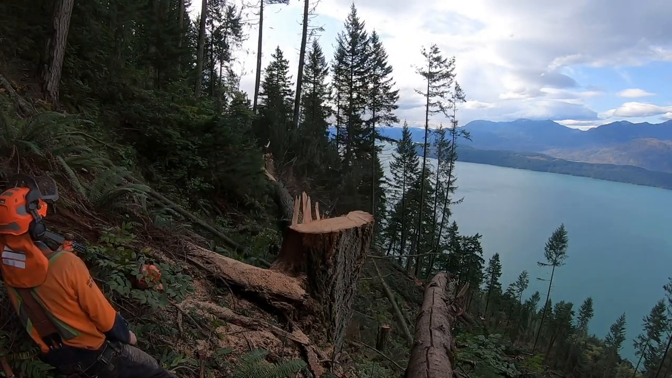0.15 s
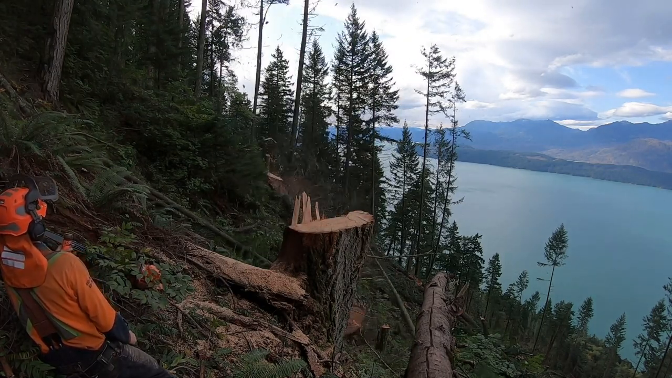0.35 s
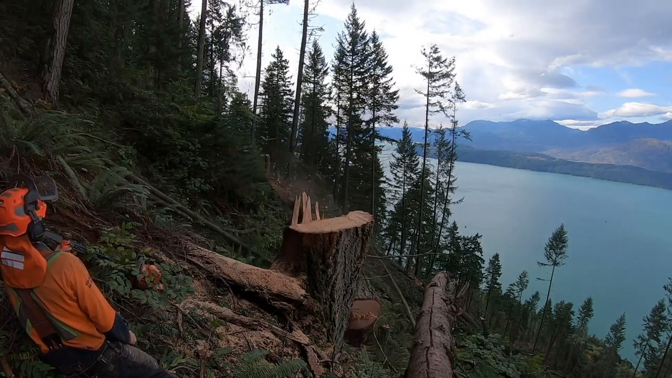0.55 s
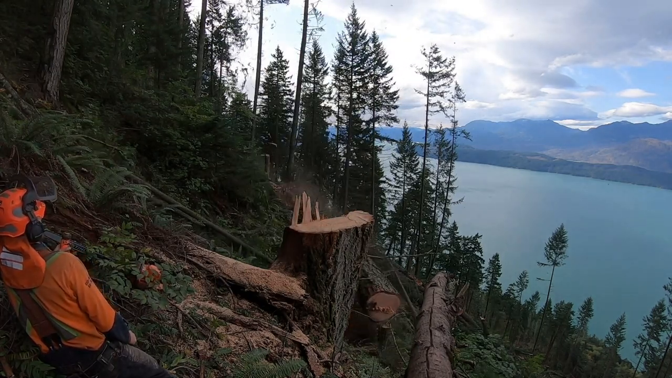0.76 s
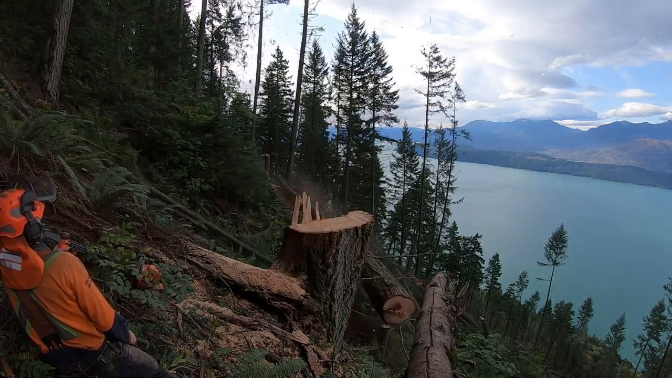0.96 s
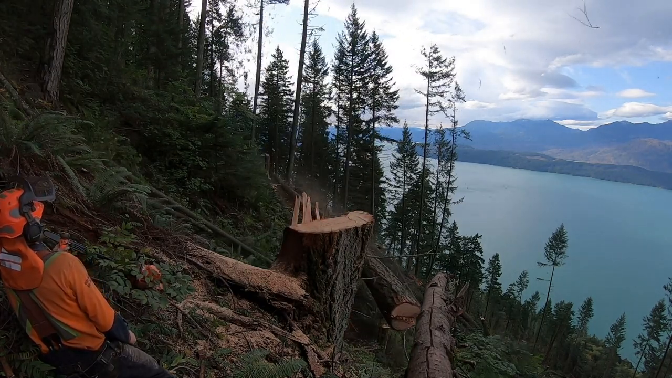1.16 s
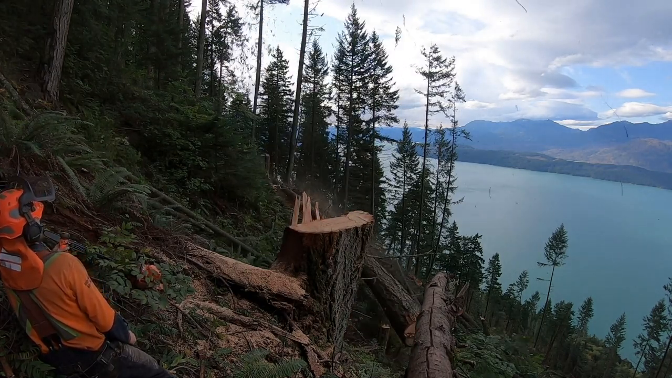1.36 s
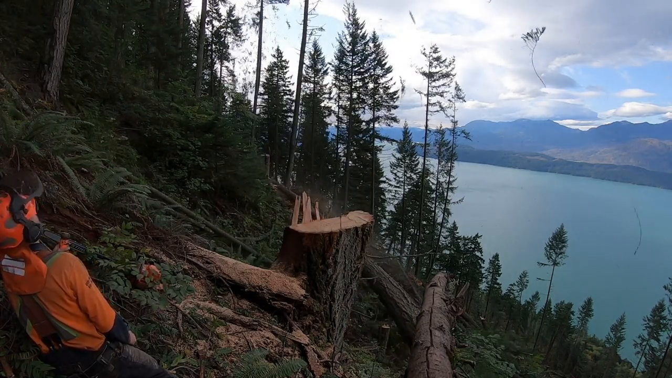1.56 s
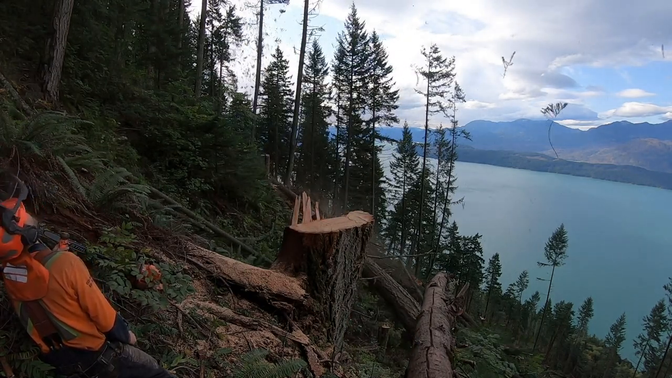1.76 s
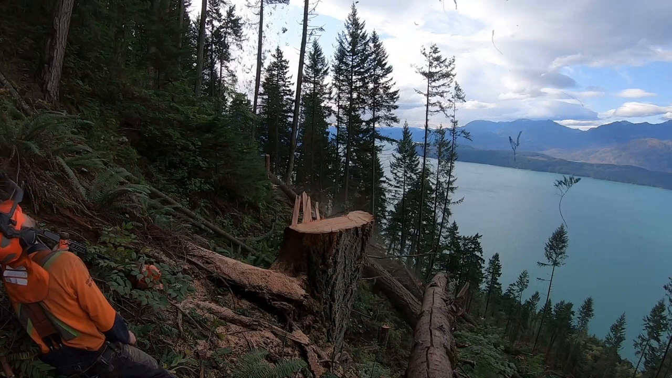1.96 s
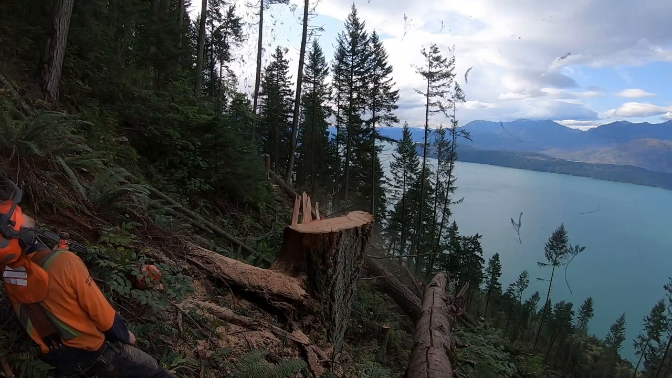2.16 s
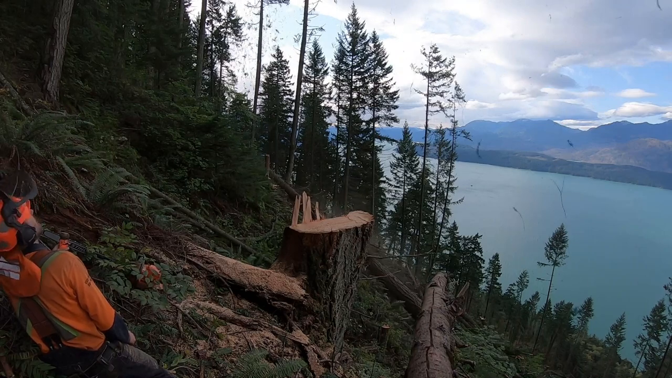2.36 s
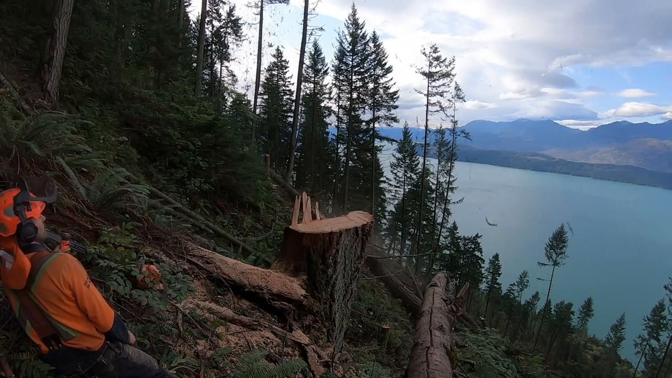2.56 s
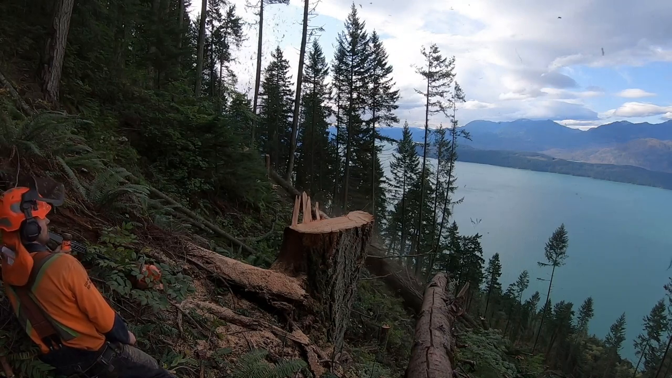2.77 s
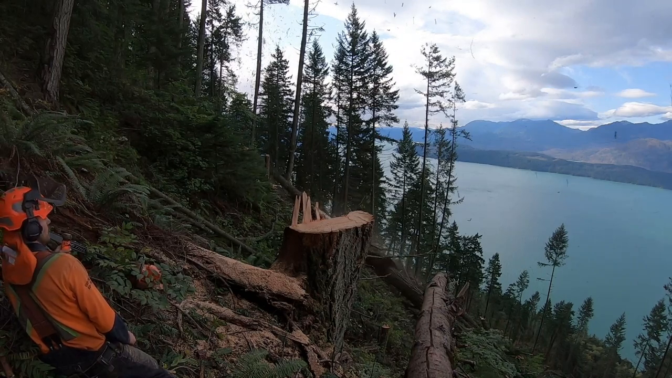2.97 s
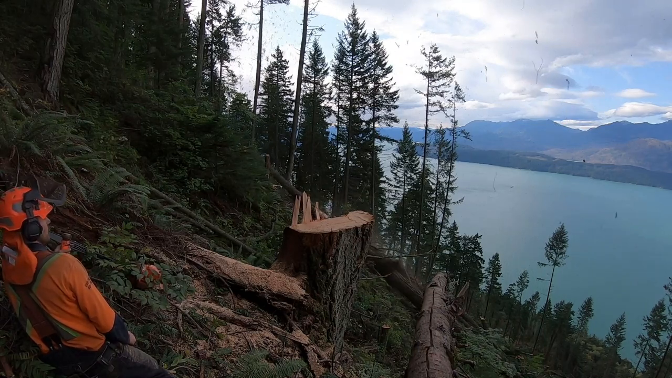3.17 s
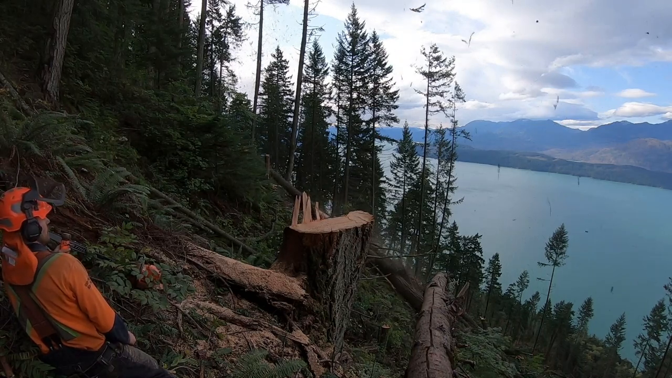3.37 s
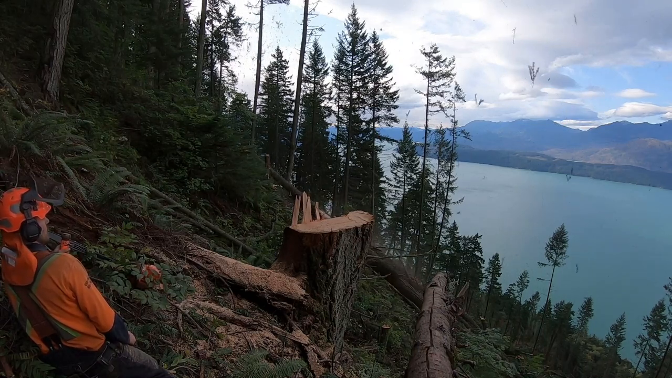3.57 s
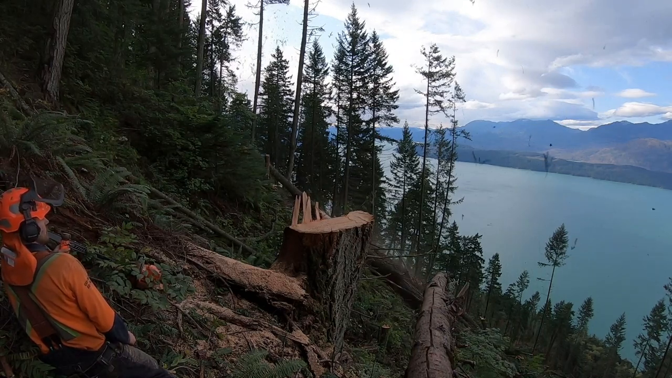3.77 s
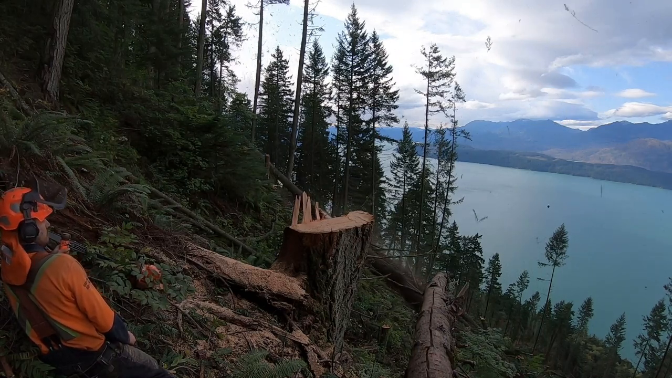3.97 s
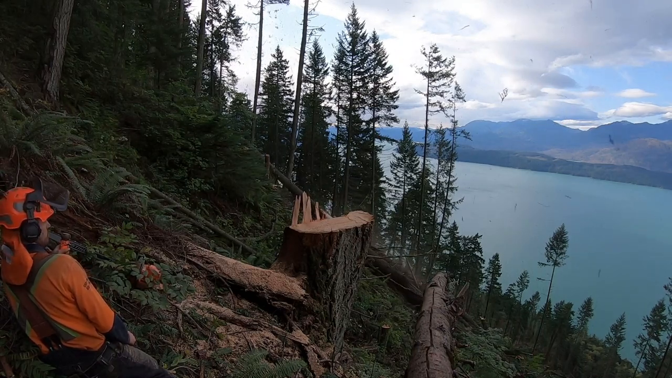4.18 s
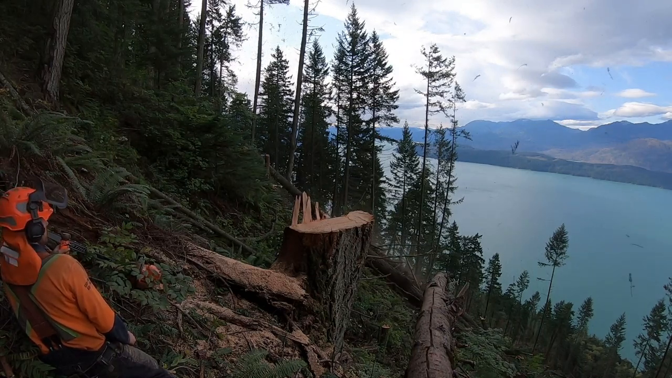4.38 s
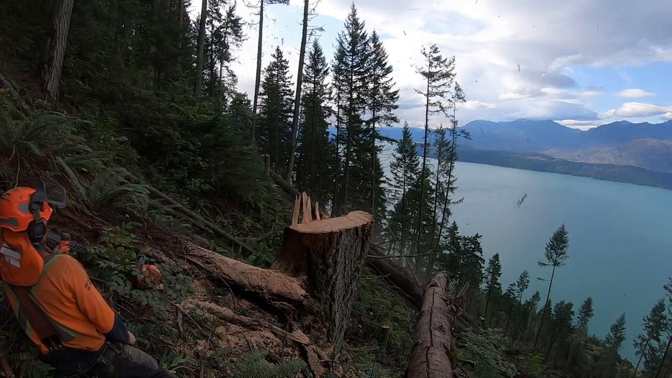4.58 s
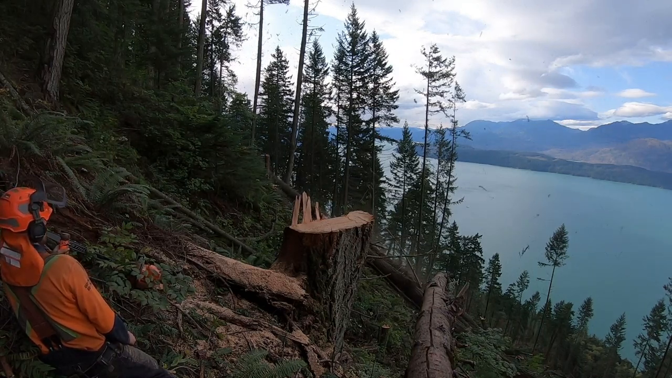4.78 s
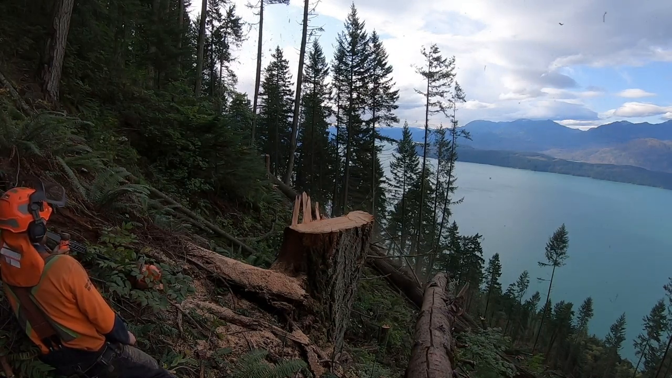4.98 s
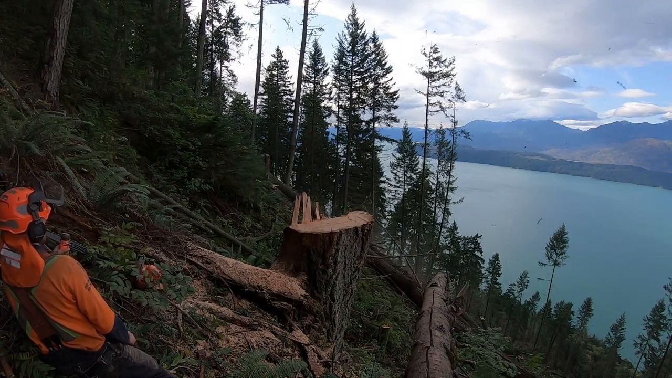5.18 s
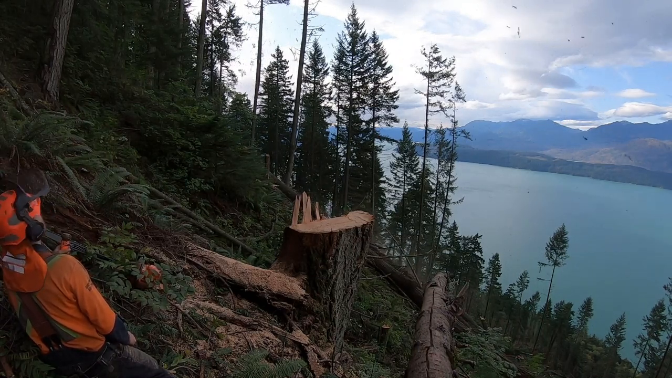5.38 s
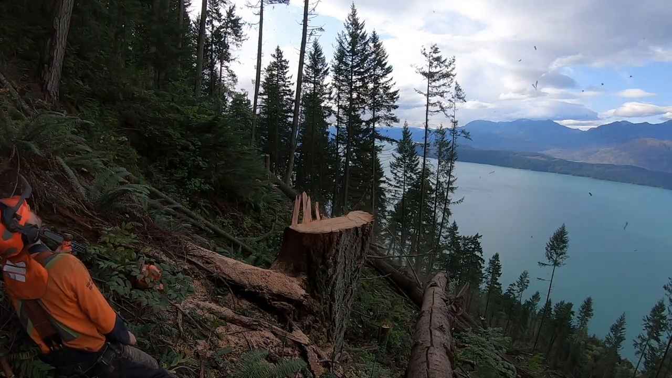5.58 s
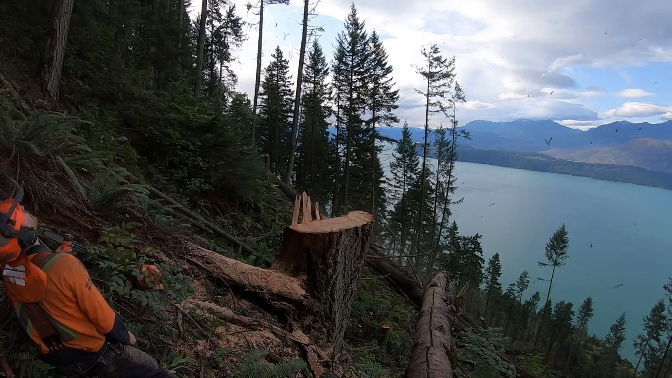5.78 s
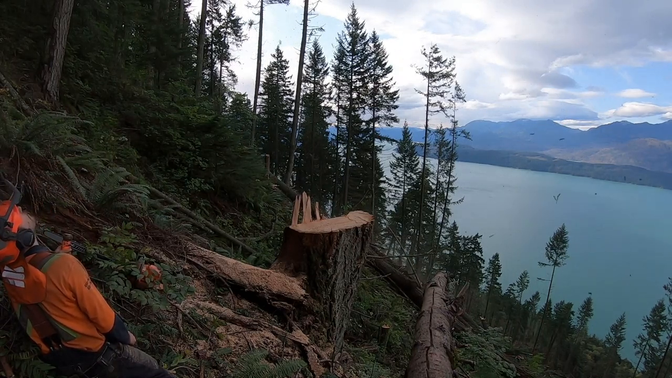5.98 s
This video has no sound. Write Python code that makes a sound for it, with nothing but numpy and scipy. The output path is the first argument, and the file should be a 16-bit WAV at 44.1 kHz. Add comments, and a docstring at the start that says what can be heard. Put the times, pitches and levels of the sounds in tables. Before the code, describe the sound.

Low, heavy pounding and dense crackling come first, over rumbling soil and hissing needles. The noise drops to light snaps, then surges midway with loud hollow limb knocks and more ground thuds. Dry branches keep popping, many crisp and close together, until only faint rustle and small clicks remain. Heard close to the stump through a small stereo microphone, surrounding trunks scattering each crack.

```python
"""A steep forest slope, heard from beside a stump: a big felled conifer crashes and slides downhill.
The trunk pounds the ground in deep decaying swings, and filtered noise keeps the soil rumbling.
Limbs knock and wrench, branches snap: each is a sagging tone with a burst of torn-fibre noise.
The rushing crown is made of thousands of tiny clicks, shaped into grinding, crackle and hiss.
The standing trees scatter every knock and snap back as a quick flurry and a long dull tail."""
import sys
import numpy as np
from scipy import signal
from scipy.fft import rfft, irfft, next_fast_len
from scipy.io import wavfile
from scipy.ndimage import uniform_filter1d

SR = 44100
rng = np.random.default_rng(int(sys.argv[2]) if len(sys.argv) > 2 else 0)


def transcribe(u):
    """Save the signal u as a 16-bit wav file named by the first command-line argument.

    u: samples, shape (n,) or (channels, n), limited to [-1, 1]; the rate is SR.
    q: integer samples, one column per channel.
    """
    v = np.clip(np.atleast_2d(u).T, -1, 1)
    q = np.round(v * 32767).astype(np.int16)
    wavfile.write(sys.argv[1], SR, q)


N = 266143
T = np.arange(N) / SR

# the steady slide between crashes: time_s, ground_rumble_db, crown_rustle_db
SLIDE = [(0, -26, -23), (0.3, -28, -27.5), (0.65, -20.5, -28.5), (1.03, -24, -30), (1.26, -28.5, -38),
         (1.5, -39, -40), (2.0, -36, -40), (2.36, -27, -40.5), (2.6, -31, -38.5), (3.08, -24, -37.5),
         (3.33, -28.5, -39.5), (3.97, -34.5, -40.5), (4.6, -37.5, -37.5), (5.2, -35.5, -42.5),
         (5.4, -52, -46), (5.77, -53.5, -49), (6.03, -45, -40)]
# pitch of the ground's shaking, higher once the trunk has slid away downhill: time_s, pitch_hz
GROUND_PITCH = [(0, 53.3), (1.3, 51.2), (2.4, 70.3), (6.03, 65.5)]
# the crown ploughs into trees and ground:
# full_level_s, hold_s, ground_rumble_db, limb_grinding_db, twig_crackle_db
CRASHES = [(0.079, 0.17, -18, -34, -24.5), (0.402, 0.16, -18, -33, -29.5), (1.75, 0.093, -39, -37, -43.5),
           (2.062, 0.28, -46, -43, -44.5), (2.635, 0.1, -23, -26.5, -30), (2.726, 0.13, -18.5, -27.5, -37),
           (2.923, 0.084, -23, -33, -36.5), (3.43, 0.1, -31, -34.5, -32.5), (3.584, 0.026, -23, -21, -32.5),
           (3.693, 0.16, -42, -37.5, -39), (4.081, 0.037, -39, -31, -30.5), (4.357, 0.023, -32, -27, -38.5),
           (4.469, 0.034, -25.5, -33, -38), (4.79, 0.071, -26.5, -35.5, -59), (5, 0.04, -58, -38, -60),
           (5.546, 0.034, -46, -49, -47), (5.84, 0.15, -55, -49, -42.5)]
# the trunk pounds the ground: start_s, level_db, pitch_hz
POUNDS = [(0.066, -4, 47), (0.183, -9.5, 46.2), (0.409, -8.5, 44.7), (0.459, -7.5, 47), (0.672, -8.5, 52),
          (1.042, -15.5, 63.4), (2.79, -25, 56.6), (2.92, -12, 65), (3.071, -15, 58), (3.421, -12, 75.4),
          (3.58, -10, 65.5), (3.69, -15, 64.5), (5.602, -34.5, 57.4)]
# heavy limbs knock and burst: time_s, level_db, pitch_hz
KNOCKS = [(0.003, -17.5, 294), (1.054, -19, 131), (2.082, -19, 423), (2.093, -19.5, 259),
          (2.252, -21.5, 274), (2.36, -23, 141), (2.619, -8.5, 607), (2.85, -10.5, 336), (2.957, -12, 286),
          (3.42, -11, 397), (3.524, -19.5, 273), (3.554, -15.5, 250), (3.566, -19, 290), (3.6001, -4, 262),
          (3.6022, -9, 470), (4.355, -18.5, 214), (4.471, -15.5, 230), (4.749, -14, 196),
          (4.7903, -17, 244), (4.819, -18, 176), (5.53, -31, 273), (5.582, -25, 335), (5.652, -28, 368),
          (5.999, -18.5, 570)]
# green limbs wrench and tear slowly: time_s, level_db, pitch_hz
WRENCHES = [(0.12, -11.5, 470), (0.146, -13, 388), (0.216, -13, 570), (1.784, -28, 806), (3.2, -21, 513),
            (3.228, -19, 656), (3.268, -20, 545)]
# the loudest branches snap: time_s, level_db, pitch_hz, left_minus_right_db
SNAPS = [(0.032, -11.5, 4080, 0), (0.0598, -11.5, 1256, 5), (0.342, -9, 1690, 0), (0.467, -9.5, 1530, 4),
         (0.876, -16.5, 3190, -2), (1.006, -14, 1390, -10), (1.034, -15, 1600, 3), (1.0589, -11, 4280, 0),
         (1.0596, -20.5, 8850, -10), (1.161, -24.5, 4600, -3), (1.443, -24, 3500, -11),
         (1.513, -22.5, 2280, -8), (1.5926, -15.5, 3000, -3), (1.6715, -22, 3420, -3),
         (1.9092, -18.5, 2560, -9), (2.0271, -20, 2135, 4), (2.5282, -15, 3080, -4),
         (2.762, -18, 1290, -18), (2.8095, -20, 1610, -24), (2.8535, -10.5, 1100, -1),
         (2.8779, -7, 2324, 2), (2.992, -15, 2221, 5), (3.0126, -11, 1900, 2), (3.079, -24, 2580, -10),
         (3.325, -18, 3240, -10), (3.4232, -16.5, 1126, -1), (3.487, -16.5, 2660, -11),
         (3.5272, -18.5, 1340, -15), (3.552, -15, 3350, -3), (3.579, -12, 1850, 2), (3.593, -11, 1340, 4),
         (3.747, -21, 3500, 3), (3.859, -21, 2580, 2), (4.0565, -23, 2880, -12), (4.096, -27, 3100, -11),
         (4.114, -17, 3000, -7), (4.133, -14, 1800, -10), (4.2072, -22.5, 3300, -6), (4.298, -14, 1690, -7),
         (4.307, -14, 3110, -4), (4.322, -21, 2520, -5), (4.3711, -9.5, 1460, 4), (4.4125, -15.5, 1990, 4),
         (4.4387, -11.5, 2717, -8), (4.4845, -10.5, 2400, 2), (4.4883, -8.5, 1130, 2), (4.54, -14, 1410, 4),
         (4.5632, -23.5, 4220, 0), (4.626, -14.5, 3660, -6), (4.6349, -14.5, 1386, -5),
         (4.707, -18, 3270, -6), (4.7442, -12, 1700, 0), (4.7458, -6, 1170, 0), (4.8327, -12.5, 1156, -3),
         (4.841, -24.5, 3600, -6), (5.023, -19.5, 1330, 0), (5.128, -14.5, 2200, 4), (5.166, -17, 2070, 6),
         (5.285, -21, 4160, -7), (5.4885, -19.5, 3010, -4), (5.567, -30, 3660, -4), (5.921, -32, 3160, -4)]
# colour of the crushed crown, before its layers are levelled: frequency_hz, relative_db
CROWN_COLOUR = [(70, 3), (130, 3.5), (300, -1.5), (600, -5), (1200, -3), (2200, -6), (3400, -9),
                (5000, -20.5), (7000, -22), (10000, -27.5), (15000, -25.5)]
# how unlike the two ports hear the slope: frequency_hz, side_minus_mid_db
STEREO_WIDTH = [(60, -21), (170, -47), (350, -20), (700, -7.5), (1400, -4), (2800, -10.5), (5500, -5.5),
                (9000, 1)]
# colour of the microphone ports: frequency_hz, gain_db
PORT_COLOUR = [(15, -44), (35, 1), (3800, -3), (4800, -1.5), (7100, -0.5), (8100, -7), (9600, -1.5),
               (10700, -7), (11600, -16), (14000, -18), (15500, -30.5)]
# balance of the microphone ports: frequency_hz, left_minus_right_db
PORT_BALANCE = [(200, -.6), (3900, -.6), (6900, 2), (9900, -6), (10900, -11), (12000, -6)]

TOP_HZ = 15500
# a crash builds quickly, holds, then dies away; the soil settles more slowly than the crown
CRASH_ATTACK_DB_PER_S, CROWN_RELEASE_DB_PER_S, GROUND_RELEASE_DB_PER_S = 400, 140, 119
# limbs grind a little under the rustle; needles hiss under the twigs and swell less than they do
LIMB_UNDER_DB, NEEDLE_UNDER_DB, NEEDLE_SWELL, USUAL_TWIG_DB = -2.5, -10, 0.91, -38.5
# decay of each swing, in cycles of its own pitch
POUND_CYCLES, KNOCK_CYCLES, WRENCH_CYCLES = 1.37, 1.7, 7
# thin branches ring for more cycles: cycles at the reference pitch, and the power of pitch they grow with
SNAP_CYCLES, SNAP_REFERENCE_HZ, SNAP_RING_POWER = 2.9, 1512, 0.32
# small sticks: range of pitch, level above the twig crackle, its scatter, and spread left to right
STICK_LOW_HZ, STICK_HIGH_HZ = 970, 6120
STICK_OVER_DB, STICK_SCATTER_DB, STICK_PAN_DB = 7, 0.5, 8
# bright tick of the last fibres: level before it softens for thick branches, time to peak, lower edge
TICK_DB, TICK_DECAY_S, TICK_LOW_HZ = -20.5, 0.0016, 3550


def undb(db):
    """Decibels to gain."""
    return 10 ** (np.asarray(db) / 20)


def unit(x):
    """Scale to rms 1."""
    return x / np.sqrt(np.mean(x ** 2))


def along(points, hz):
    """Read (Hz, value) points on a log-frequency axis."""
    f, value = np.transpose(points)
    return np.interp(np.log(hz + 1), np.log(f), value)


def shape(x, gain):
    """Filter by a gain that is a function of frequency."""
    size = next_fast_len(N + 8192)
    spectrum = rfft(x, size) * gain(np.fft.rfftfreq(size, 1 / SR))
    return irfft(spectrum, size)[..., :N]


def band(x, lo_hz, hi_hz, order=2):
    """Causal band-pass."""
    edges = [lo_hz, min(hi_hz, .47 * SR)]
    return signal.sosfilt(signal.butter(order, edges, "band", fs=SR, output="sos"), x)


def add(out, s, sound):
    """Mix a sound in at time s."""
    i = max(int(s * SR), 0)
    out[..., i:i + sound.shape[-1]] += sound[..., :N - i]


def spread(mid, side):
    """Turn mid and side into left and right, with a stereo width that varies with frequency."""
    side = shape(side, lambda f: undb(along(STEREO_WIDTH, f)))
    return mid + side * np.array([[1], [-1]])


def walk(per_s):
    """Glide in straight lines between random levels; the spread is near 1.9."""
    hold = int(SR / per_s)
    steps = np.repeat(rng.standard_normal(N // hold + 1), hold)
    return 2.3 * uniform_filter1d(steps, hold)[:N]


def with_crashes(slide_db, crash_dbs, release_db_per_s):
    """Level of one layer: the steady slide plus the attack, hold and release of every crash."""
    power = undb(slide_db) ** 2
    for (s, hold, *_), db in zip(CRASHES, crash_dbs):
        before_db = CRASH_ATTACK_DB_PER_S * np.maximum(s - T, 0)
        after_db = release_db_per_s * np.maximum(T - s - hold, 0)
        power = power + undb(db - np.minimum(before_db + after_db, 100)) ** 2
    return 10 * np.log10(power)


def recoil(hz, cycles, rise, sag):
    """A swing that builds, then dies away while its pitch sags; returns the swing and its envelope."""
    # rise and decay are counted in cycles
    turn = np.arange(int(SR * (rise + 7 * cycles) / hz)) * hz / SR
    attack = np.sin(np.pi / 2 * np.minimum(turn / rise, 1)) ** 2
    envelope = attack * np.exp(-np.maximum(turn - rise, 0) / cycles)
    pitch = hz * (1 + sag * (np.exp(-turn / (rise + cycles)) - .5))
    return envelope * np.sin(2 * np.pi * np.cumsum(pitch) / SR), envelope


def fracture(hz, cycles, rise, sag, ring_db, tear_db, splinter_db):
    """One break: the recoil, fibres tearing around its pitch, and a thin spray of splinters above."""
    swing, envelope = recoil(hz, cycles, rise, sag)
    size = len(swing)
    # the first 1000 samples let the filters settle and are dropped
    fibres = rng.standard_normal((2, size + 1000))
    # the envelope says how many fibres give way at each moment
    tear = unit(band(fibres[0], 0.45 * hz, 1.503 * hz, order=3)[-size:] * envelope)
    splinters = unit(band(fibres[1], hz, 2.24 * hz)[-size:] * envelope)
    noise = undb(tear_db) * tear + undb(splinter_db) * splinters
    return undb(ring_db) * swing + np.std(swing) * noise


def forest(x, near_db, near_t60, far_db, far_t60, far_top_hz):
    """Nearby trunks scatter a quick flurry of echoes; the far slope returns a long dull tail."""
    t = T[:SR]
    # cubing the noise leaves a few strong echoes among many faint ones
    flurry = rng.standard_normal((2, SR)) ** 3 * undb(-60 * t / near_t60) * (t > .003)
    tail = band(rng.standard_normal((2, SR)), 270, far_top_hz, order=1)
    tail = tail * undb(-60 * t / far_t60) * np.minimum(t / 0.044, 1)
    response = (undb(near_db) * unit(flurry) + undb(far_db) * unit(tail)) / np.sqrt(SR)
    mid, side = signal.fftconvolve(x[None], response, axes=1)[:, :N]
    return spread(mid, side)


def ground(rumble_db, width_octaves=0.44, skirt_db=-15):
    """The sliding trunk keeps the soil shaking: bands of noise weighted around one deep pitch."""
    centre = np.interp(T, *np.transpose(GROUND_PITCH))
    out = 0
    for hz in np.geomspace(25, 140, 9):
        weight = np.exp(-.5 * (np.log2(hz / centre) / width_octaves) ** 2) + undb(skirt_db)
        noise = rng.standard_normal(N)
        shaking = shape(noise, lambda f: np.exp(-(np.log2((f + 1) / hz) / 0.23) ** 2))
        out = out + weight * unit(shaking)
    # level the random swells so that the rumble follows its given loudness
    out = out / np.sqrt(uniform_filter1d(out ** 2, size=2600) + 1e-9)
    return out * undb(rumble_db)


def crackle(per_s, scatter_db, rush_db):
    """Countless small breaks of every thickness over an even rush, flat in spectrum; returns mid and side."""
    out = np.zeros((2, N))
    for hz in np.geomspace(180, 9000, 12):
        # thin twigs far outnumber thick ones
        count = int(per_s * (.6 + hz / 1000) * N / SR)
        when, strength, sign, place = rng.random((count, 4)).T
        at = (when * N).astype(int)
        # most breaks are small, a few much stronger
        sizes = undb(scatter_db * np.minimum(-np.log(1 - strength), 4)) * np.sign(sign - .5)
        side_sizes = sizes * np.sqrt(3) * (2 * place - 1)
        clicks = np.array([np.bincount(at, w, N) for w in (sizes, side_sizes)])
        # wider bands need more power to stay flat
        out += unit(band(clicks, .68 * hz, 1.47 * hz, order=3)) * np.sqrt(hz)
    return unit(out) + undb(rush_db) * rng.standard_normal((2, N))


def crown(limb_db, twig_db, needle_db):
    """The crown ploughs through the undergrowth in quick surges: limbs grind, twigs crackle, needles hiss."""
    grains = crackle(per_s=140, scatter_db=4.4, rush_db=-0.5)
    grains = shape(grains, lambda f: undb(along(CROWN_COLOUR, f)))
    surge_db = .7 * walk(per_s=55)
    out = 0
    for lo, hi, db in ((120, 700, limb_db), (700, 3500, twig_db), (3500, 20000, needle_db)):
        part = shape(grains, lambda f: 1 / np.sqrt((1 + (lo / (f + 1)) ** 8) * (1 + (f / hi) ** 8)))
        out = out + unit(part) * undb(db + surge_db)
    mid, side = out
    return spread(mid, side)


def sticks(twig_db, count):
    """Small sticks that break at random, as loud as the crown is busy; rows like those of SNAPS."""
    when, thinness = rng.random((count, 2)).T
    strength, place = rng.standard_normal((count, 2)).T
    at = (when * N).astype(int)
    hz = STICK_LOW_HZ * (STICK_HIGH_HZ / STICK_LOW_HZ) ** thinness
    level_db = twig_db[at] + STICK_OVER_DB - STICK_SCATTER_DB * strength
    return list(zip(T[at], level_db, hz, STICK_PAN_DB * place))


def snap_cycles(hz):
    """How many cycles a branch of this pitch takes to decay."""
    return SNAP_CYCLES * (hz / SNAP_REFERENCE_HZ) ** SNAP_RING_POWER


def tick():
    """The last fibres part: a few milliseconds of bright noise that swell quickly and die away."""
    t = T[:600]
    envelope = (t / TICK_DECAY_S * np.exp(1 - t / TICK_DECAY_S)) ** 2
    return undb(TICK_DB) * envelope * unit(band(rng.standard_normal(len(t)), TICK_LOW_HZ, TOP_HZ))


def branches(snaps):
    """Dry branches snap; the thinner, the higher the pitch and the stronger the bright tick."""
    out = np.zeros((2, N))
    for s, db, hz, pan_db in snaps:
        gain = undb(db + np.array([[pan_db], [-pan_db]]) / 2)
        snap = fracture(hz, snap_cycles(hz), rise=3.5, sag=.6, ring_db=-2, tear_db=-3.5, splinter_db=-17)
        # the first fibres part a moment before the branch goes
        add(out, s - 2.3 / hz, gain * snap)
        # the tick peaks at the listed time
        add(out, s - TICK_DECAY_S, gain * min(hz / TICK_LOW_HZ, 1) ** 2 * tick())
    return out


def limbs():
    """Thick limbs give way with a dull knock or a longer wrench."""
    out = np.zeros(N)
    for events, cycles in ((KNOCKS, KNOCK_CYCLES), (WRENCHES, WRENCH_CYCLES)):
        for s, db, hz in events:
            knock = fracture(hz, cycles, rise=1.2, sag=0.3, ring_db=-3.5, tear_db=-2.5, splinter_db=-21.5)
            # the build-up begins just ahead of the listed time
            add(out, s - 0.41 / hz, undb(db) * knock)
    return out


def trunk():
    """Each landing of the trunk sets the ground swinging; the log itself booms an octave higher."""
    out = np.zeros(N)
    for s, db, hz in POUNDS:
        thud, _ = recoil(hz, POUND_CYCLES, rise=0.76, sag=0.057)
        boom, _ = recoil(2.0 * hz, POUND_CYCLES, rise=0.78, sag=0.074)
        add(out, s, undb(db) * thud)
        add(out, s, undb(db - 9.5) * boom)
    return out


def scene():
    """Trunk, limbs, branches and crown on the wooded slope."""
    s, *columns = np.transpose(SLIDE)
    shaking_db, rustle_db = (np.interp(T, s, c) for c in columns)
    _, _, crash_rumble, crash_limbs, crash_twigs = np.transpose(CRASHES)
    rumble_db = with_crashes(shaking_db, crash_rumble, GROUND_RELEASE_DB_PER_S)
    limb_db = with_crashes(rustle_db + LIMB_UNDER_DB, crash_limbs, CROWN_RELEASE_DB_PER_S)
    twig_db = with_crashes(rustle_db, crash_twigs, CROWN_RELEASE_DB_PER_S)
    needle_db = USUAL_TWIG_DB + NEEDLE_UNDER_DB + NEEDLE_SWELL * (twig_db - USUAL_TWIG_DB)
    sliding = ground(rumble_db) + crown(limb_db, twig_db, needle_db) + trunk()
    breaks = branches(SNAPS + sticks(twig_db, count=70)) + limbs()
    echoes = forest(breaks.mean(axis=0), near_db=-8, near_t60=0.057,
                    far_db=-16.0, far_t60=1.0, far_top_hz=3030)
    return sliding + breaks + echoes


def record(dry):
    """Two small ports colour the sound, the right one brighter at the top; a steep low-pass ends the treble."""
    halves = np.array([[.5], [-.5]])
    heard = shape(dry, lambda f: undb(along(PORT_COLOUR, f) + along(PORT_BALANCE, f) * halves))
    return signal.sosfilt(signal.ellip(8, .2, 70, TOP_HZ, fs=SR, output="sos"), heard)


dry = scene()
out = record(dry)
transcribe(out)
```